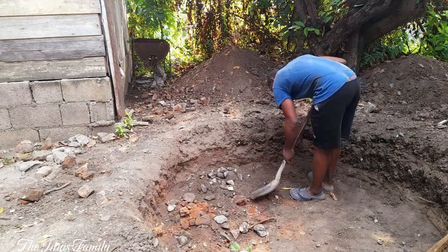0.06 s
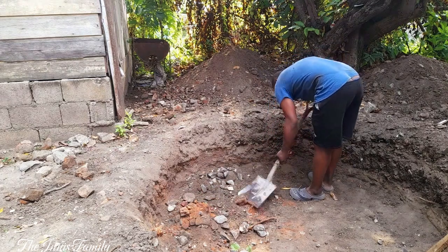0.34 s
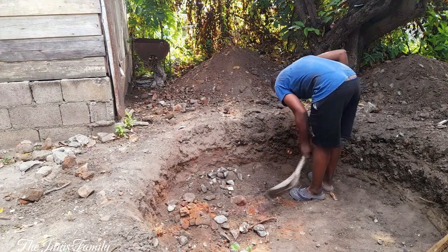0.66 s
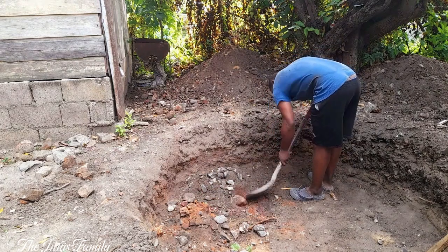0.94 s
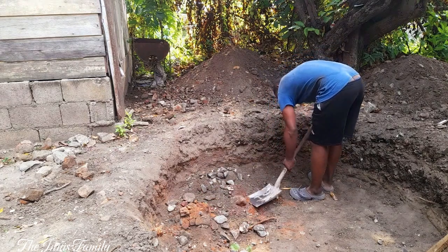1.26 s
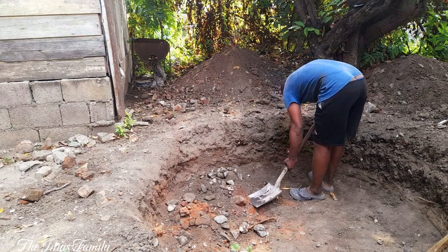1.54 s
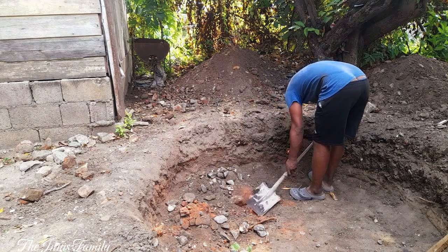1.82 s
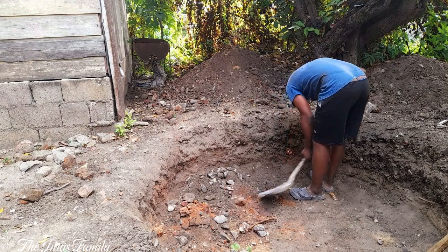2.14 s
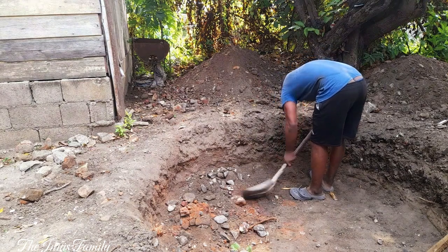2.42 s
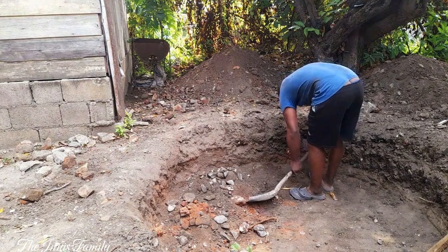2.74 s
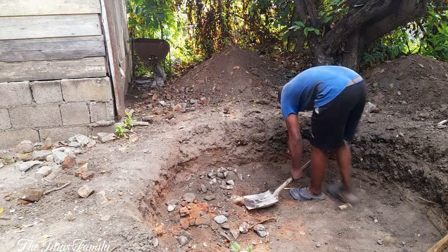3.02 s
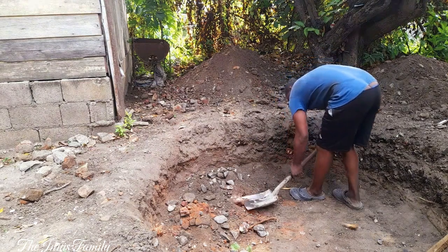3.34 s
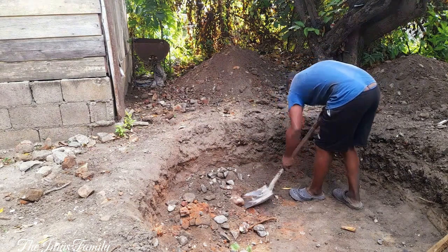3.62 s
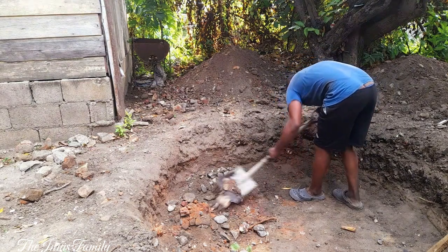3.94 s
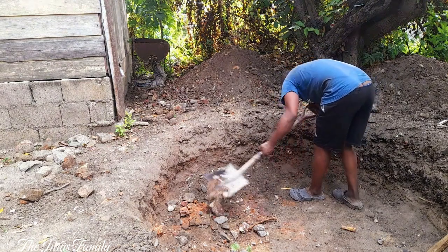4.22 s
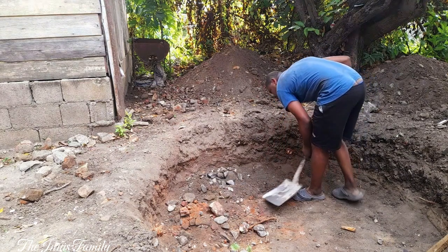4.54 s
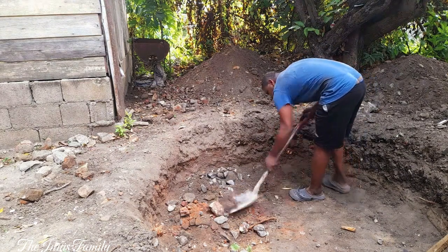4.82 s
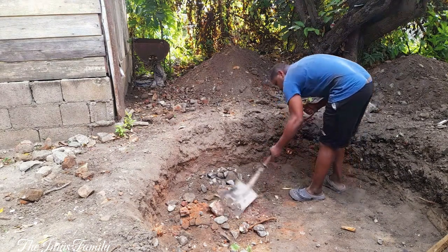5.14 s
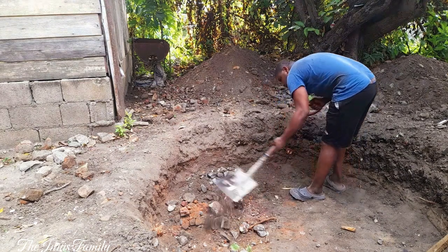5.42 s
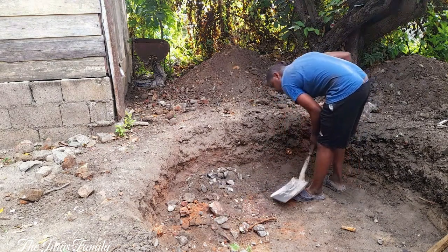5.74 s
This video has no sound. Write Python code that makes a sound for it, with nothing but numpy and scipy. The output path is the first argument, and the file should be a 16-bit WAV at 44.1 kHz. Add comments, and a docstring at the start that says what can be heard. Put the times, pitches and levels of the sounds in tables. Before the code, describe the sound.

A steel shovel jabs and scrapes through stony soil in a quiet yard, clanking on stones, with the blade sometimes ringing.

```python
"""A steel shovel digs stony soil a few metres away, a little to the right, over hum, breeze and insects.
From the start, jabs and stick-slip slides of gravel on the blade come in turn and overlap. Each jab is
a burst of tiny collisions: soil thuds, stones knock, pressed steel clanks, grit crunches. The freed
blade rings in its modes, pebbles click, and deep jabs shake the shaft. Near 4 s the blade rings most, until
falling gravel damps it; a few last jabs and slides follow. The pit and a wall reflect the digging."""
import sys
import numpy as np
from scipy import signal
from scipy.fft import rfft, irfft
from scipy.io import wavfile

SR = 44100
rng = np.random.default_rng(int(sys.argv[2]) if len(sys.argv) > 2 else 0)


def file_out(sig):
    """Save sig as 16-bit WAV at sys.argv[1]."""
    # one column per channel
    cols = np.atleast_2d(sig).T
    # limit, then scale
    lim = np.clip(cols, -1, 1)
    pcm = np.round(lim * 32767).astype(np.int16)
    wavfile.write(sys.argv[1], SR, pcm)


N = 254898
BURST = SR // 5   # samples that one contact lasts at most

# bending modes of the blade: (frequency [Hz], free t60 [s], level struck on face, edge, corner, tip [dB])
BLADE_MODES = [(463, .5, -20, -30, -30, -15), (697, .38, -7, -15, -11, -3), (922, 1.1, -13, -3, -18, 0),
               (1135, .4, -17, -30, -32, -8), (1213, .3, -20, -22, -26, -20),
               (1303, .28, -10, -12, -24, -12), (1425, .45, -10, -5, -9, -18),
               (1573, .27, -4, -16, -12, -10), (1716, .25, -15, -11, -25, -17),
               (1846, .7, -14, -7, -24, -12), (2063, .3, -7, -13, 0, -18), (2143, .5, -8, -23, -19, -16),
               (2298, .25, 0, -6, -14, -12), (2545, .25, -16, -13, -21, -20),
               (2765, .22, -9, -15, -16, -19), (2850, .2, -9, -14, -11, -14),
               (2982, .28, -15, -23, -12, -14), (3188, .45, -21, -24, -29, -24),
               (3400, .18, -11, -17, -20, -21), (3715, .4, -19, -28, -23, -25),
               (3837, .25, -8, -21, -18, -17), (4320, .2, -13, -15, -23, -20),
               (4892, .3, -14, -24, -26, -23), (5700, .25, -20, -27, -24, -28)]


def from_db(db):
    """Decibels to amplitude ratio."""
    return 10 ** (np.asarray(db) / 20)


def unit_rms(x):
    """Normalisation to unit mean power."""
    return x / np.sqrt(np.mean(x ** 2) + 1e-20)


def at_hz(points, hz):
    """Interpolation over log frequency."""
    return np.interp(np.log(hz + 1e-9), np.log(np.array(points)[:, 0]), np.array(points)[:, 1])


def add(track, s, sound):
    """Superposition: a sound joins the track at time s."""
    i = max(round(s * SR), 0)
    track[i:i + len(sound)] += sound[:N - i]


def band(x, low_hz, high_hz, order=2):
    """Band-pass filtering, held below half the sample rate."""
    edges = [low_hz, min(high_hz, SR / 2 - 1000)]
    return signal.sosfilt(signal.butter(order, edges, "band", fs=SR, output="sos"), x + 1e-18)


def resonance(x, hz, q):
    """A damped resonator with unit gain at its peak."""
    return signal.lfilter(*signal.iirpeak(hz, max(q, 1), fs=SR), x + 1e-18)


def colour(x, spectrum):
    """Filtering by a smooth gain curve."""
    return irfft(rfft(x) * from_db(at_hz(spectrum, np.fft.rfftfreq(N, 1 / SR))), N)


def grains(size, per_s, spread_db):
    """Shot noise: collisions at random moments, mostly small and a few large."""
    strength = from_db(spread_db * np.minimum(rng.exponential(1, size), 4))
    return unit_rms((rng.random(size) < per_s / SR) * strength * rng.choice([-1, 1], size))


def diffuse(size):
    """A diffuse field: left and right are coherent in the bass, nearly unrelated in the treble."""
    # likeness of the channels: (frequency [Hz], coherence [0-1])
    coherence = [(60, 0.55), (200, 0.81), (600, 0.073), (1500, 0.033), (4000, 0.16), (16000, 0.048)]
    mid, side = rfft(rng.standard_normal((2, size)))
    alike = np.clip(at_hz(coherence, np.fft.rfftfreq(size, 1 / SR)), 0, 1)
    return irfft(np.sqrt(1 + alike) * mid + np.sqrt(1 - alike) * side * [[1], [-1]], size)


def outdoors(air_db, breeze_gain_db):
    """Ambient noise: distant hum and leaves, and the low turbulence of a breeze on the microphone."""
    # the yard at rest: (frequency [Hz], relative spectral density [dB])
    air_spectrum = [(20, -25), (48, -16), (95, -3), (170, -9), (400, -8.5), (800, -14), (1500, -21.5),
                    (2100, -17.5), (3200, -28), (5200, -27.5), (6500, -38.5), (8000, -30), (16000, -40.5)]
    # strength of the breeze: (time [s], relative level [dB])
    gusts = [(0, -44), (1.5, -47.5), (2.5, -41), (4.25, -38), (4.6, -26), (4.7, -35.5), (5.78, -37.5)]
    breeze_db = np.interp(np.arange(N) / SR, *np.transpose(gusts))
    breeze = unit_rms(band(diffuse(N), 43.4, 99))
    air = unit_rms(colour(diffuse(N), air_spectrum))
    return from_db(air_db) * air + from_db(breeze_db + breeze_gain_db) * breeze


def insects(db, hz, q):
    """Far insects merge into narrow-band noise with slow amplitude modulation."""
    waver = unit_rms(np.interp(np.arange(N), np.linspace(0, N, 14), rng.standard_normal(14)))
    chorus = unit_rms(resonance(resonance(diffuse(N), hz, q), hz, q))
    return from_db(db + 1.4 * waver) * chorus


def gravel_flow():
    """Incoherent slides add in power as they swell and decay: scrape and sand levels in dB per sample."""
    # loads of gravel: (peak time [s], rise by 10 dB [s], t60 [s], scrape level [dB], sand level [dB])
    slides = [(.12, 0.095, .5, -23.5, -20), (.27, 0.091, .5, -21.5, -26.5),
              (0.822, 0.014, 0.03, -16.5, -23), (1.08, 0.026, .5, -28.5, -54),
              (1.719, 0.042, 0.64, -19.5, -34), (1.839, 0.088, 0.92, -29.5, -31),
              (2.38, 0.05, 1.0, -26, -32.5), (2.93, 0.074, 0.53, -22.5, -33.5),
              (3.36, 0.053, 1, -27.5, -33), (3.502, 0.017, 1.7, -29.5, -32),
              (3.63, 0.034, 0.04, -26.5, -29), (3.8, 0.072, 2.35, -24.5, -30.5), (3.96, 0.1, 0.4, -14, -26),
              (4.2, 0.13, 0.13, -21, -26), (4.428, 0.15, 0.53, -27.5, -37), (4.89, 0.16, 1.82, -25.5, -32),
              (5.218, 0.044, 0.26, -21, -19), (5.6, .2, .5, -41.5, -43)]
    t, scrape, sand = np.arange(N) / SR, 1e-12, 1e-12
    for s, swell, t60, scrape_db, sand_db in slides:
        power = from_db(10 * np.minimum(t - s, 0) / swell - 60 * np.maximum(t - s, 0) / t60) ** 2
        scrape += power * from_db(scrape_db) ** 2
        sand += power * from_db(sand_db) ** 2
    return 10 * np.log10(scrape), 10 * np.log10(sand)


def sliding(scrape_gain_db, sand_gain_db, singing_db):
    """Stick-slip friction: gravel scrapes the steel, whose modes sing when pushed; sand trickles off."""
    # gravel on steel: (frequency [Hz], relative spectral density [dB])
    scrape_spectrum = [(88, -4), (150, -2.5), (381, -2.5), (693, 1.5), (1220, -4.5), (1540, -6.5),
                       (2080, -3.5), (8000, -14.5), (10400, -23), (17600, -120)]
    scrape_db, sand_db = gravel_flow()
    catching = from_db(2.4 * unit_rms(band(rng.standard_normal(N), 34.4, 105)))
    rub = grains(N, 2200, 2.1) * catching
    singing = unit_rms(sum(from_db(face_db) * resonance(rub, hz, q=hz * t60 / 3)
                           for hz, t60, face_db, *_ in BLADE_MODES))
    pressure = from_db(3.1 * np.minimum(scrape_db + 25, 0))
    scrape = unit_rms(colour(rub, scrape_spectrum)) + from_db(singing_db) * pressure * singing
    sand = unit_rms(band(grains(N, 1200, 5) * catching, 5500, 18000))
    return from_db(scrape_db + scrape_gain_db) * scrape + from_db(sand_db + sand_gain_db) * sand


def cuts(gravel_hz, spread_octaves=.5):
    """Coupling grows with depth: a buried edge drives soil, stones and grit; on rock the steel leads."""
    # (time [s], length [s], steel level [dB], clank pitch [Hz], depth [0 bare rock to 1 buried])
    edge_cuts = [(.068, 0.025, -27.5, 1810, 0.61), (0.093, 0.024, -22.5, 1790, 1),
                 (0.124, 0.014, -16, 2020, 0.56), (0.162, 0.023, -19, 2300, 0.94),
                 (0.302, 0.015, -22.5, 2200, 0.73), (.763, 0.013, -27, 2460, 0.84),
                 (0.772, 0.014, -13, 2400, 0.86), (0.899, 0.015, -13.5, 2050, 0.85),
                 (1.07, 0.024, -24.5, 2600, 0.99), (1.153, 0.0088, -15.5, 2430, 0.99),
                 (1.636, 0.014, -9.5, 1640, 0.74), (1.659, 0.026, -19.5, 2240, 0.76),
                 (1.668, .006, -21, 2200, 0.68), (2.31, 0.03, -13.5, 1760, 0.93),
                 (2.88, 0.026, -21, 2600, 1), (3.318, 0.037, -29.5, 2190, 0.86),
                 (3.374, 0.032, -30, 1550, 1), (3.523, 0.02, -13.5, 2630, 0.59),
                 (3.539, 0.017, -15.5, 2150, 0.83), (3.569, 0.0056, -14.5, 2440, 0.94),
                 (3.721, 0.019, -24.5, 2320, 1), (3.741, 0.012, -11, 1720, 0.62),
                 (3.771, 0.03, -16, 2030, 0.42), (3.898, 0.022, -12, 2470, 0.45),
                 (3.93, 0.008, -12.5, 1850, 0.75), (4.019, 0.0084, -13, 3400, .1),
                 (4.086, 0.021, -9.5, 2780, 0.1), (4.128, 0.0056, -11.5, 4100, 0.22),
                 (4.206, 0.016, -12, 2240, 0.22), (4.706, 0.024, -10, 2140, 0.62),
                 (4.74, 0.013, -17.5, 2360, 0.73), (4.753, .022, -13.5, 3670, 0.89),
                 (4.88, 0.013, -20, 2780, 0.46), (5.077, 0.005, -12.5, 3730, 0.55),
                 (5.209, 0.028, -15.5, 2620, 0.16), (5.283, 0.004, -22, 2110, 0.53)]
    for s, length, db, hz, depth in edge_cuts:
        bare = 1 - depth
        soil_db = db - 6 - 36 * bare
        stone_db = db - 4 - 33 * bare ** 2
        grit_db = db - 2.5 - 23 * bare ** 2
        stone_hz = gravel_hz * 2 ** (spread_octaves * rng.uniform(-0.84, 1))
        yield s, length, soil_db, stone_db, stone_hz, db, hz, grit_db


def collisions(length, per_s, spread_db, hard_s):
    """Impact excitation: a short contact is mostly one hard impulse, a long one a crowd of small ones."""
    crowd = grains(BURST, per_s, spread_db)
    crowd[int(.0008 * SR)] += np.sqrt(length * SR) * min(hard_s / length, 2) ** 2
    return crowd


def push(length, t60, rise_share=0.015):
    """Contact force builds, holds while the blade bites, and decays exponentially."""
    t = np.arange(BURST) / SR
    return (1 - np.exp(-t / (rise_share * length))) * from_db(-60 * np.maximum(t - length, 0) / t60)


def soil(length, hz):
    """Heavily damped resonance: packed earth and the shaft take the blow with a low thud."""
    force = push(length, t60=0.037) + from_db(-9.5) * push(length, t60=0.35)
    hits = collisions(length, 6000, 2.1, hard_s=0.0045) * force
    return band(resonance(hits, hz, 1.64) + .5 * resonance(hits, 0.496 * hz, 5.7), 121, 584)


def stone(length, hz):
    """A stone on the grounded blade excites three hollow, inharmonic modes; the earth round it crumbles."""
    hits = collisions(length, 7000, 2.8, hard_s=0.0053) * push(length, t60=0.05)
    crumbs = from_db(-25.5) * grains(BURST, 2200, 8) * push(length, t60=0.24)
    knock = sum(gain * resonance(hits, ratio * hz, q)
                for ratio, q, gain in [(1, 8.3, 1), (1.438, 21.6, 0.5), (2.063, 26, 0.21)])
    return band(knock + 0.15 * hits + crumbs, 438, 1770, order=3)


def steel(length, hz, choked):
    """Contact damping: the pressed blade clanks briefly, brightest at a pitch set by where it is held."""
    force = push(length, t60=0.028) + from_db(-10.5) * push(length, t60=0.37)
    hits = collisions(length, 3000, 3.8, hard_s=0.0063) * force
    clank = signal.fftconvolve(hits, choked)[:BURST]
    return band(.33 * hits + .6 * resonance(hits, hz, 3) + 1.4 * clank, 1050, 5500, order=3)


def grit(length):
    """Brittle fracture: sand grains crack under the edge and a few trickle after."""
    hits = collisions(length, 6600, 7.9, hard_s=0.0063) * push(length, t60=0.0087)
    crumbs = from_db(-12) * grains(BURST, 2500, 2.5) * push(length, t60=0.23)
    return band(hits + crumbs, 7300, 17400) + 0.069 * band(hits + crumbs, 10000, 25500)


def at_level(sound, length, db):
    """Normalisation of a burst by the rms of its loud part."""
    loud_part = sound[:int((length + .006) * SR)]
    return from_db(db) * sound / np.sqrt(np.mean(loud_part ** 2) + 1e-20)


def jabs(soil_gain_db, stone_gain_db, steel_gain_db, grit_gain_db):
    """Superposition: every contact sounds soil, stone, steel and grit together."""
    out, tap = np.zeros(N), signal.unit_impulse(BURST // 2)
    # impulse response of the blade pressed into the ground
    choked = sum((-1) ** k * from_db(face_db) * resonance(tap, hz, q=107)
                 for k, (hz, _, face_db, *_) in enumerate(BLADE_MODES))
    contacts = [*cuts(gravel_hz=714), *knocks(clank_hz=2100)]
    for s, length, soil_db, stone_db, stone_hz, steel_db, steel_hz, grit_db in contacts:
        thud_hz = 313.6 * (.015 / length) ** 0.084   # shorter contacts thud higher
        add(out, s, at_level(soil(length, thud_hz), length, soil_db + soil_gain_db))
        add(out, s, at_level(stone(length, stone_hz), length, stone_db + stone_gain_db))
        add(out, s, at_level(steel(length, steel_hz, choked), length, steel_db + steel_gain_db))
        add(out, s, at_level(grit(length), length, grit_db + grit_gain_db))
    return out


def lingering(x, settle_s):
    """Leaky integration of power: an rms envelope that outlasts the sound."""
    keep = np.exp(-1 / (settle_s * SR))
    return np.sqrt(signal.lfilter([1 - keep], [1, -keep], x ** 2 + 1e-18))


def ground(blows, thump_db, thump_s):
    """Relaxation after a blow: the ground thumps briefly, and crumbs of earth go on falling."""
    rumble = unit_rms(band(rng.standard_normal(N), 28, 122))
    patter = unit_rms(band(grains(N, per_s=12, spread_db=4.5), 4000, 17000, order=1))
    thump = from_db(thump_db) * lingering(band(blows, 120, 600), thump_s) * rumble
    crumbs = from_db(-43.5) * lingering(blows, settle_s=0.31) * patter
    return thump + crumbs


def knocks(clank_hz):
    """Transmission: a loose stone sounds almost alone; a bedded one passes the blow to earth and blade."""
    # (time [s], length [s], stone level [dB], stone pitch [Hz], bedding [0 loose to 1 fast in the earth])
    struck_stones = [(0.108, 0.0089, -15.5, 774, 0.65), (0.197, 0.02, -18, 727, 0.7),
                     (0.312, 0.0052, -9.5, 610, 0.58), (0.331, 0.015, -20, 710, 0.39),
                     (0.794, .021, -20.5, 458, 0.79), (1.051, 0.032, -28.5, 634, 1),
                     (1.172, 0.0039, -22.5, 494, 0.37), (1.626, 0.0036, -16.5, 1050, 0.28),
                     (1.7114, .003, -11.5, 650, 0.58), (1.716, 0.031, -19, 926, 0.17),
                     (2.343, 0.017, -17.5, 690, 0.76), (2.364, 0.011, -33, 637, 1),
                     (2.451, 0.029, -36.5, 1010, 0.84), (2.603, 0.0057, -29, 1010, 0.54),
                     (2.643, 0.0064, -19, 693, 0.17), (2.699, 0.019, -15, 738, 0.23),
                     (2.718, .022, -15, 984, 0.25), (2.843, 0.024, -25.5, 650, 0.61),
                     (2.914, 0.0041, -10.5, 580, 0.47), (3.587, 0.01, -21, 900, 0.19),
                     (3.762, 0.023, -13, 612, 0.53), (4.72, 0.031, -21, 940, 0.8),
                     (4.774, 0.0124, -21, 490, 0.68), (4.9811, 0.0022, -10, 503, 0.61),
                     (5.004, 0.0032, -26.5, 477, .05), (5.042, 0.0039, -26, 575, 0.75),
                     (5.067, 0.004, -12, 587, 0.46)]
    for s, length, db, hz, bedding in struck_stones:
        soil_db = db - 24 + 29.5 * bedding
        steel_db = db - 15 + 16 * bedding
        grit_db = db - 34.5 + 32 * bedding
        yield s, length, soil_db, db, hz, steel_db, clank_hz, grit_db


def free_blade(rise_s):
    """Free vibration: the place struck weights the blade's modes, and soil on it shortens their decay."""
    # blows that leave the blade free: (time [s], level [dB], place struck [name], t60 factor [ratio])
    strikes = [(.126, -13, "face", 0.12), (.2, -35, "corner", 1.6), (.316, -23.5, "corner", 0.75),
               (1.715, -18, "tip", 0.39), (1.831, -36, "tip", .6), (3.376, -28, "face", 1.06),
               (3.936, -9, "face", 0.39), (3.985, -14.5, "corner", 1.3), (4.02, -19.5, "face", 1.9),
               (4.083, -15.5, "face", 0.51), (4.131, -18, "face", 1.64), (4.213, -10, "edge", 1.03),
               (5.217, -17.5, "face", 0.85), (5.284, -13.5, "corner", 0.83)]
    # places struck, in the order of the level columns of BLADE_MODES [name]
    places = ("face", "edge", "corner", "tip")
    mute_at_s, mute_db = 4.44, -4.5   # gravel falls on the ringing blade
    out, t = np.zeros(N), np.arange(SR // 2) / SR
    hz, t60, *place_db = np.transpose(BLADE_MODES)[:, :, None]
    for s, db, place, t60_factor in strikes:
        swing = np.sin(2 * np.pi * (hz * t + rng.random(hz.shape)))
        muted_db = mute_db * (s < mute_at_s) * np.clip((s + t - mute_at_s) / 0.059, 0, 1)
        modes = from_db(db + muted_db + place_db[places.index(place)] - 60 * t / (t60 * t60_factor)) * swing
        add(out, s, modes.sum(axis=0) * (1 - np.exp(-t / rise_s)))
    return out


def pebbles(q, crack_share):
    """Inelastic impact: each falling pebble gives one dry click and a weaker rebound."""
    # single pebbles: (time [s], relative peak level [dB], pitch [Hz])
    drops = [(.515, -38, 2480), (.579, -42, 9000), (1.921, -35, 8000), (1.936, -25, 8100),
             (2.002, -42, 9000), (2.234, -27.5, 7500), (2.518, -27.5, 570), (3.094, -26, 890),
             (3.34, -32, 4500), (3.642, -21, 7000), (4.39, -18.5, 3570), (4.414, -17.5, 6100),
             (4.421, -7, 2620), (4.423, -19, 470), (4.436, -12.5, 3670), (5.337, -18.5, 6140),
             (5.561, -27, 5900)]
    out = np.zeros(N)
    for s, db, hz in drops:
        hits = np.zeros(BURST // 4)
        rebound = int(rng.uniform(.0006, .003) * SR)
        hits[[0, rebound]] = 1, .45
        click = resonance(hits, hz, q) + crack_share * band(hits, hz / 3, hz * 3, order=1)
        add(out, s, from_db(db) * click / np.abs(click).max())
    return out


def shaft(rise_s):
    """Bending modes of the wooden shaft, whose pitch depends on how firmly the blade is stuck."""
    # low modes set off by deep jabs: (time [s], level [dB], frequency [Hz], t60 [s])
    shudders = [(0.796, -6, 141, 0.04), (2.345, -9, 136, 0.087), (2.346, -4.5, 210, 0.066),
                (2.349, -8, 326, .1), (3.546, -18, 361, .1), (3.78, -15, 293.7, 0.33),
                (4.769, -18, 204, 0.085)]
    out, t = np.zeros(N), np.arange(BURST) / SR
    for s, db, hz, t60 in shudders:
        add(out, s, from_db(db - 60 * t / t60) * (1 - np.exp(-t / rise_s)) * np.sin(2 * np.pi * hz * t))
    return out


def from_the_right(x, lag_s=.000075):
    """Time and level difference: direct sound reaches the left microphone later and slightly weaker."""
    late = irfft(rfft(x) * np.exp(-2j * np.pi * np.fft.rfftfreq(N, 1 / SR) * lag_s), N)
    return np.array([late * from_db(-.3), x])


def scatter(x, db=-5, t60=0.018, block=1024):
    """Scattering: rough ground returns treble by paths that differ per side and vary as the blade turns."""
    out, t = np.zeros((2, N + 2 * block)), np.arange(SR // 100) / SR
    fade = from_db(-60 * t / t60)
    for i in range(0, N, block):
        paths = rng.standard_normal((2, len(t))) * fade / np.linalg.norm(fade)
        out[:, i:i + 2 * block] += irfft(rfft(x[i:i + block], 2 * block) * rfft(paths, 2 * block))
    return from_db(db) * band(out[:, :N], 390, 21600, order=1)


def yard(x, near_db, near_t60, far_db):
    """Reverberation: quick reflections from the pit and the wall, then a faint tail from house and trees."""
    # decay of the tail: (frequency [Hz], t60 [s])
    tail_t60 = [(100, 0.35), (500, 0.31), (2500, 0.3), (8000, 0.43), (16000, 0.33)]
    # colour of the reflections: (frequency [Hz], gain [dB])
    echo_spectrum = [(100, 8.5), (300, 5.5), (800, 11), (3000, 10), (8000, 10), (16000, 10)]
    t = np.arange(SR * 2 // 3) / SR
    noise, echo = diffuse(len(t)), 0
    edges = np.geomspace(70, 18000, 9)
    for low, high in zip(edges, edges[1:]):
        hz = np.sqrt(low * high)
        near = unit_rms(from_db(-60 * t / near_t60) * (t > .002))
        far = unit_rms(from_db(-60 * t / at_hz(tail_t60, hz)) * (1 - np.exp(-t / 0.048)))
        envelope = from_db(near_db) * near + from_db(far_db) * far
        echo += band(noise, low, high) * from_db(at_hz(echo_spectrum, hz)) * envelope
    return signal.fftconvolve(x[None], echo / np.sqrt(2 * len(t)), axes=1)[:, :N]


def scene():
    """Direct, scattered and reverberant sound of the digging add to the ambient noise of the yard."""
    # response of the microphone: (frequency [Hz], gain [dB])
    microphone = [(60, -5), (130, 2), (250, 2.5), (700, -1), (1100, -0.5), (2000, -1.5), (3000, 0.5),
                  (4500, 2), (6500, -0.5), (9000, 0.5), (15000, -8.5)]
    blows = jabs(soil_gain_db=-2.5, stone_gain_db=-1, steel_gain_db=-2.5, grit_gain_db=0.5)
    blows += from_db(-1.5) * shaft(rise_s=0.0037)
    gravel = sliding(scrape_gain_db=-6, sand_gain_db=-3.5, singing_db=-1)
    ticks = from_db(9.5) * pebbles(q=1.6, crack_share=0.063)
    ringing = free_blade(rise_s=0.0009)
    radiated = blows + gravel + .5 * ticks
    echoes = yard(radiated + 0.16 * ringing, near_db=-10, near_t60=0.062, far_db=-20)
    direct = blows + gravel + ticks + ringing + ground(blows, thump_db=-20, thump_s=0.014)
    digging = colour(from_the_right(direct) + scatter(radiated) + echoes, microphone)
    return digging + outdoors(air_db=-45, breeze_gain_db=-8) + insects(db=-63, hz=6600, q=10)


def record(dry):
    """Soft saturation rounds the loudest peaks, and a steep low-pass cuts the top."""
    rounded = 1.119 * np.tanh(dry / 1.055)
    return signal.sosfilt(signal.ellip(10, .2, 70, 15900, fs=SR, output="sos"), rounded)


dry = scene()
out = record(dry)
file_out(out)
```